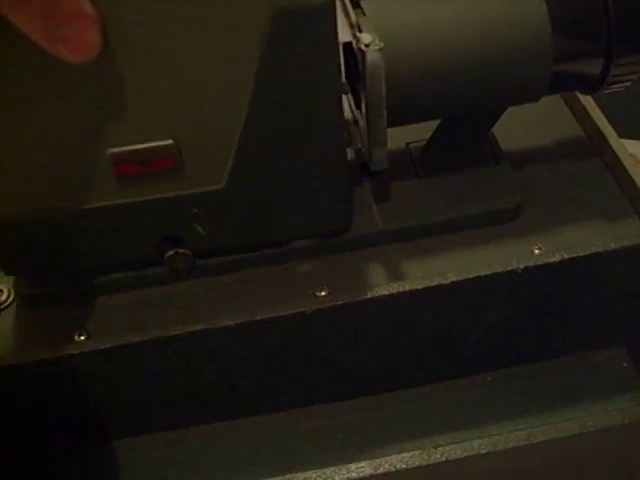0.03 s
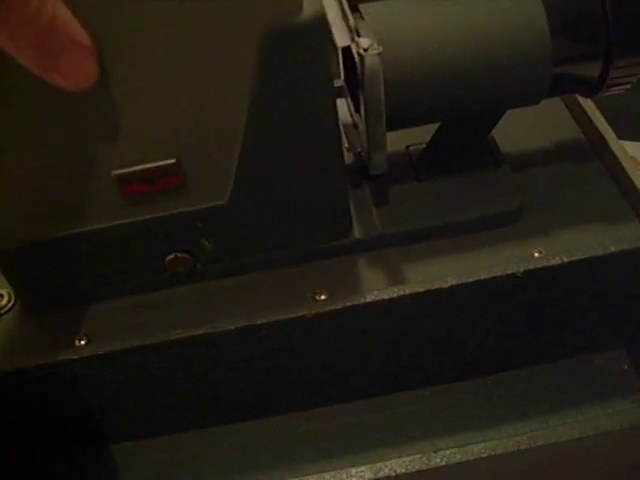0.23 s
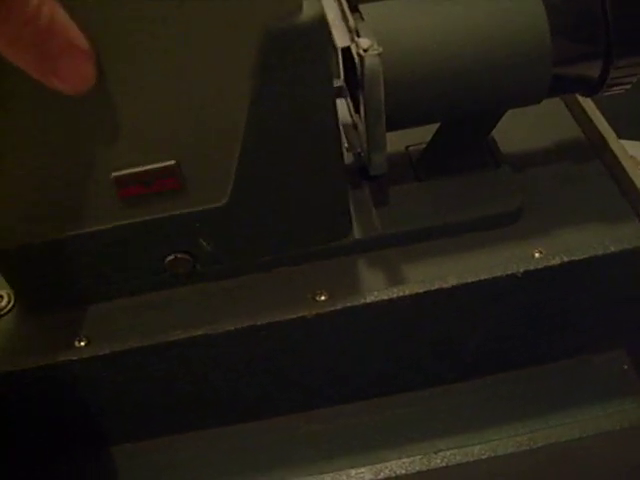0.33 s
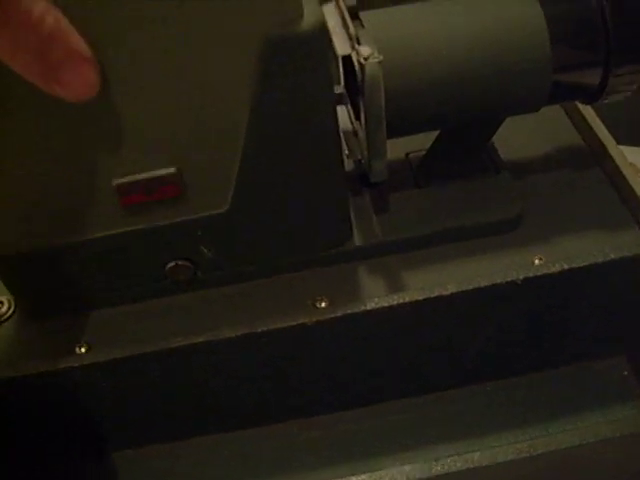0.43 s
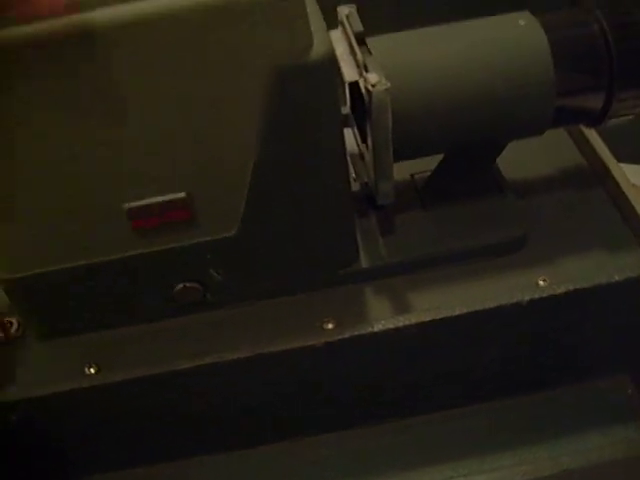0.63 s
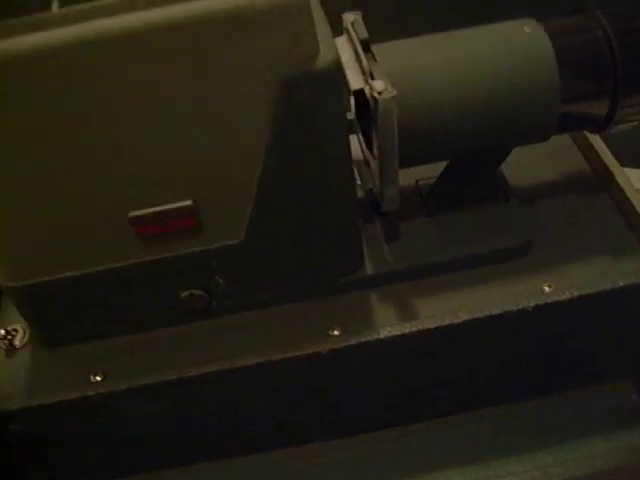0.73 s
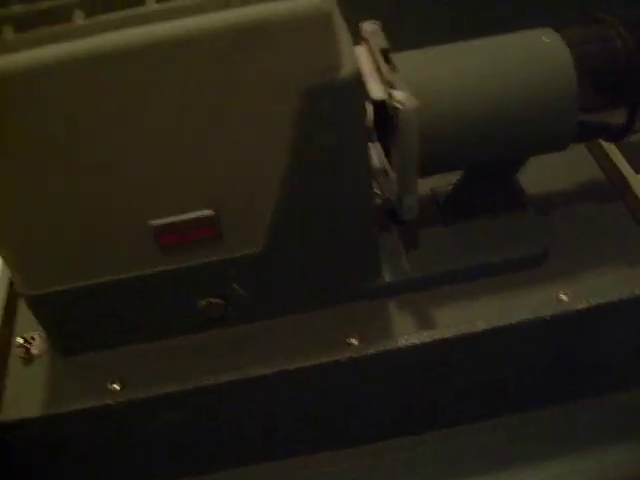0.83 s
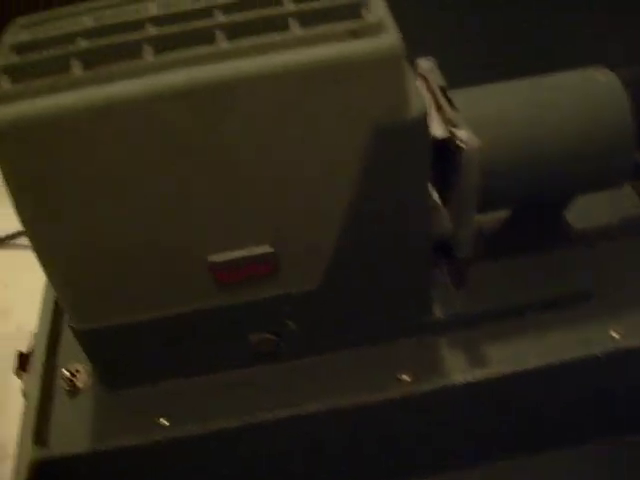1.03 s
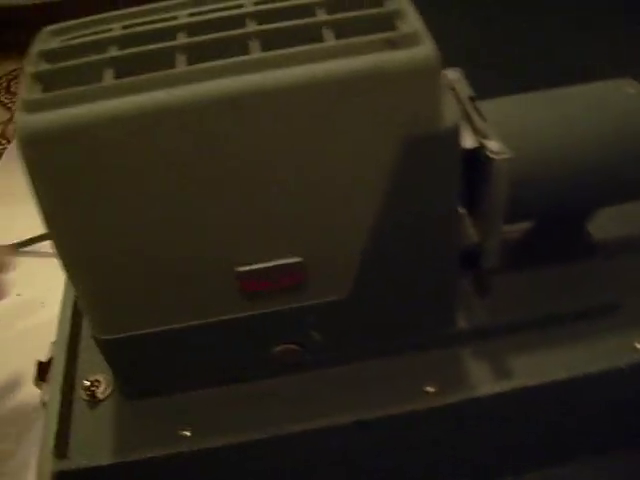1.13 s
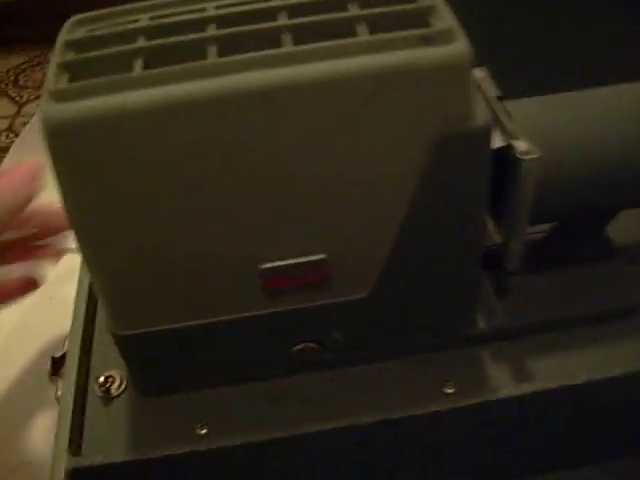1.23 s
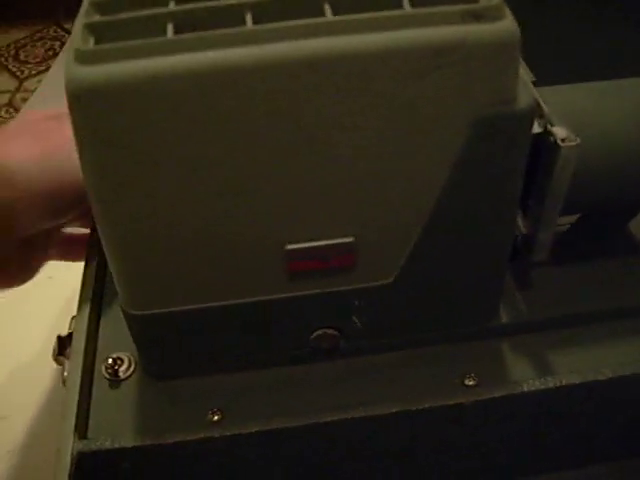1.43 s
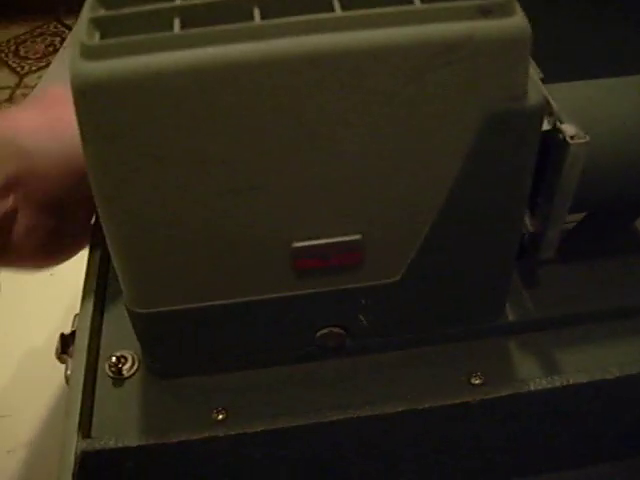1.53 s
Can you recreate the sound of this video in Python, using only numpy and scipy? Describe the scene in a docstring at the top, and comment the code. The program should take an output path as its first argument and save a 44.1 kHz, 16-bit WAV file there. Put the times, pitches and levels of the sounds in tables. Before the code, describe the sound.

Close up in a small room, a slide projector gives light clicks and a short scrape, then a sharp, rattling clack that rings its metal housing. Its quiet fan hums throughout, with a few tiny ticks afterwards.

```python
"""A hand-worked slide projector in a small room, close to a single microphone.
The cooling fan whirs from the start. The carrier is nudged and scrapes along its guide,
then at about 0.2 s slams home in a quick run of blows that ring the metal housing.
The room dies away, and a few faint ticks of the mechanism follow over the fan."""
import sys
import numpy as np
from scipy import signal
from scipy.io import wavfile

SR = 44100
rng = np.random.default_rng(int(sys.argv[2]) if len(sys.argv) > 2 else 0)


def inscribe(sig):
    """Save sig as 16-bit PCM at rate SR to the path in sys.argv[1].

    A 1-D sig is mono; a 2-D sig holds one channel per row.
    Samples are clipped to [-1, 1] before scaling.
    """
    pcm = np.round(np.clip(np.atleast_2d(sig).T, -1, 1) * 32767)
    wavfile.write(sys.argv[1], SR, pcm.astype(np.int16))


N = 70560
CONTACTS_PER_S = 4000


def carrier_blows(mix):
    """The carrier cracks against its stop and chatters there while the housing rings."""
    # blows: t/s, level/dB, chatter hold/s, bass/dB, treble/dB, housing ring/dB
    blows = [(0.0264, -45, 0.0092, 9.5, 5.5, -10), (0.0385, -39.5, 0.0089, 11.5, 0, -12.5),
             (0.094, -49, .010, -13, 7, -16), (0.1817, -37, 0.017, 5.5, 1, -1),
             (0.2034, -22, 0.0091, 2.5, -5.5, -13.5), (0.2115, -28.5, 0.0069, -12, -6, -14),
             (0.2205, -16, .009, -4, 0.5, -1.5), (0.2376, -27, 0.0049, -1, -4.5, -15.5)]
    # modes of the metal housing: f/Hz, level/dB, t60/s
    housing = [(125, -46, 0.15), (733, -6, 0.071), (1191, -5.5, 0.1), (1496, -2.5, 0.049),
               (1880, -14, 0.098), (2099, 3.5, 0.039), (2438, -4, 0.066), (2552, 3.5, 0.089),
               (2704, -4, 0.074), (3070, 1, 0.13), (3228, -1.5, 0.094), (3380, -9, 0.12), (3670, -10, .06),
               (4350, -16.5, .07)]
    attack_s, ring_rise_s = 0.00027, 0.0024
    chatter_t60, crack_t60 = 0.042, 0.029
    crack_db, crack_treble_db = -8, 13
    t = np.arange(SR // 2) / SR
    attack = 1 - np.exp(-t / attack_s)
    ring = sum((-1) ** k * amp(db) * decay(t, t60) * np.sin(2 * np.pi * hz * t)
               for k, (hz, db, t60) in enumerate(housing))
    ring *= 1 - np.exp(-t / ring_rise_s)
    for start_s, level_db, hold_s, bass_db, treble_db, ring_db in blows:
        held = attack * decay(np.maximum(t - hold_s, 0), chatter_t60)
        chatter = colour(contacts(CONTACTS_PER_S, len(t)) * held, steel(bass_db, treble_db))
        burst = contacts(CONTACTS_PER_S, len(t)) * attack * decay(t, crack_t60)
        crack = colour(burst, steel(bass_db, treble_db + crack_treble_db))
        add(mix, start_s, amp(level_db) * (chatter + amp(crack_db) * crack + amp(ring_db) * ring))


def steel(bass_db, treble_db):
    """Spectrum in dB of steel knocking on steel, with shelves for weight and hardness."""
    # colour of the knock: f/Hz, level/dB
    knock = [(30, -50), (110, -39.5), (180, -24), (340, -16.5), (520, -10), (610, -7), (670, -17.5),
             (735, -4), (870, -4.5), (985, -15), (1090, -3), (1240, -2), (1390, -15), (1550, -5),
             (1850, -5), (2300, -9.5), (2600, -5), (3250, 2.5), (3750, -4.5), (4200, -11), (4480, -12.5),
             (4750, -21.5), (5200, -15.5), (5500, -27), (5800, -25), (7000, -28), (8200, -38),
             (10300, -41.5), (11200, -51), (12000, -62.5)]
    bass_hz, treble_hz = 1190, 4700
    hz = bins()
    low_shelf = 1 / (1 + (hz / bass_hz) ** 4)
    high_shelf = 1 - 1 / (1 + (hz / treble_hz) ** 8)
    return read(knock, hz) + bass_db * low_shelf + treble_db * high_shelf


def guide_scrapes(mix):
    """The carrier slides in uneven slips that swell and fade, setting the guide ringing."""
    # scrapes: t/s, rise/s, fall/s, level/dB, treble/dB, guide ring/dB
    scrapes = [(0.05, 0.019, 0.027, -49.5, -9, -1.5), (0.0843, .012, 0.024, -43, 2, 2),
               (0.141, .027, .02, -48.5, -4.5, -13)]
    # modes of the guide: f/Hz, level/dB, t60/s
    guide = [(418, -12.5, 0.11), (1252, -16, .06), (2790, -9, .07), (3090, -8, 0.11), (3210, -7, .09)]
    slip_spread_db = 3
    t = np.arange(SR // 4) / SR
    modes = sum(amp(db) * unit(decay(t, t60) * np.cos(2 * np.pi * hz * t)) for hz, db, t60 in guide)
    for start_s, rise_s, fall_s, level_db, treble_db, ring_db in scrapes:
        slips = contacts(per_s=2900, size=len(t))
        slips = unit(slips * amp(slip_spread_db * rng.standard_normal(len(t))))
        slips *= np.interp(t, [0, rise_s, rise_s + fall_s], [0.25, 1, 0])
        rasp = colour(slips, steel(bass_db=4.5, treble_db=treble_db))
        ring = signal.fftconvolve(slips, modes / np.sqrt(len(t)))[:len(t)]
        add(mix, start_s, amp(level_db) * (rasp + amp(ring_db) * ring))


def mechanism_ticks(mix):
    """Small parts settle, each with a short burst in one band."""
    # pings and ticks: t/s, level/dB, centre f/Hz, half-width/octaves, t60/s
    ticks = [(0.096, -44.5, 5210, .04, .04), (0.4948, -68, 3970, .45, .03), (0.6604, -64, 5250, .24, .018),
             (1.5175, -56, 1020, 0.58, .06), (1.573, -54, 3170, 0.14, .04)]
    t = np.arange(SR // 4) / SR
    for start_s, level_db, centre_hz, octaves, t60 in ticks:
        band_db = -10 * np.log10(1 + (np.log2((bins() + 1) / centre_hz) / octaves) ** 8)
        burst = contacts(CONTACTS_PER_S, len(t)) * decay(t, t60)
        add(mix, start_s, amp(level_db) * colour(burst, band_db))


def fan(size=4096):
    """Air rushes through the resonant vents, with wavering blade tones."""
    # colour of the air through fan and vents: f/Hz, level/dB
    vents = [(20, -35), (60, -27.5), (115, -26.5), (180, -12), (235, -17), (345, -1), (460, -9), (600, 0),
             (665, -14.5), (750, -3), (1000, -21.5), (1120, -16), (1220, -8.5), (1340, -15), (1460, -10),
             (1580, -18), (1710, -9.5), (1920, -18), (2400, -17.5), (2650, -13), (2850, -13.5),
             (3350, -8.5), (3650, -12.5), (4000, -23), (5200, -35), (10300, -38), (12000, -56)]
    # level of the air as the projector comes nearer the microphone: t/s, level/dB
    air_level = [(0, -58.5), (.7, -60.5), (1.15, -60), (1.45, -59.5), (1.6, -57.5)]
    # blade tones: f/Hz, rms level/dB, waver depth/Hz
    tones = [(195, -76.5, 2.1), (615.6, -70, 8), (770, -85, 7)]
    wavers_per_s = 37
    t = np.arange(N) / SR
    air = unit(colour(rng.standard_normal(N + size), read(vents, bins()))[size:])
    whir = air * amp(np.interp(t, *np.transpose(air_level)))
    for hz, db, waver_hz in tones:
        drift = np.interp(t * wavers_per_s, np.arange(size), rng.standard_normal(size))
        phase = 2 * np.pi * np.cumsum(hz + waver_hz * drift) / SR
        whir += amp(db) * unit(np.sin(phase))
    return whir


def room(x, delay_s=0.006):
    """Dense reflections off near walls, each band dying at its own speed."""
    # decay of the small room: f/Hz, t60/s
    decay_times = [(150, 0.19), (500, 0.44), (800, 0.25), (1500, 0.24), (2800, 0.23), (5000, 0.19),
                   (10000, .165)]
    hz, t, bands = signal.stft(contacts(per_s=3000, size=SR // 2), SR, nperseg=256)
    bands *= decay(t, read(decay_times, hz)[:, None])
    _, tail = signal.istft(bands, SR, nperseg=256)
    out = np.zeros(N)
    add(out, delay_s, signal.fftconvolve(x, tail / np.linalg.norm(tail)))
    return out


def contacts(per_s, size):
    """Tiny impacts of random sign, one somewhere in each time slot; rms 1."""
    place, sign = rng.random((size, 2)).T
    at = ((np.arange(size) + place) * SR / per_s).astype(int)
    out = np.zeros(size)
    out[at[at < size]] = np.sign(sign - .5)[at < size]
    return unit(out)


def colour(x, gain_db):
    """Applies a minimum-phase filter of unit energy with the given spectral shape."""
    log_gain = np.log(amp(np.r_[gain_db, gain_db[-2:0:-1]]))
    taps = np.fft.ifft(np.exp(np.conj(signal.hilbert(log_gain)))).real
    return signal.fftconvolve(x, taps / np.linalg.norm(taps))[:len(x)]


def bins(size=4096):
    """Frequencies in Hz on which colours are drawn."""
    return np.fft.rfftfreq(size, 1 / SR)


def read(points, hz):
    """Reads a table on a log-frequency axis."""
    f, value = np.transpose(points)
    return np.interp(np.log(hz + 1), np.log(np.sort(f) + 1), value)


def amp(db):
    """Decibels to gain."""
    return 10 ** (np.asarray(db) / 20)


def decay(t, t60):
    """Gain that falls 60 dB in t60 seconds."""
    return amp(-60 * t / t60)


def unit(x):
    """Scales to rms 1."""
    return x / np.sqrt(np.mean(x ** 2) + 1e-20)


def add(mix, start_s, sound):
    """Mixes a sound in at a time."""
    part = mix[max(round(start_s * SR), 0):][:len(sound)]
    part += sound[:len(part)]


def scene(room_db=-14.5):
    """The slide change close up, with the room and the fan behind it; mono."""
    direct = np.zeros(N)
    carrier_blows(direct)
    guide_scrapes(direct)
    mechanism_ticks(direct)
    return (direct + amp(room_db) * room(direct) + fan())[None]


def record(dry, edge_hz=12100):
    """The recorder's band limit cuts the top treble."""
    lowpass = signal.firwin(511, edge_hz, window=("kaiser", 9), fs=SR)
    return signal.oaconvolve(dry, lowpass[None], "same")


dry = scene()
out = record(dry)
inscribe(out)
```